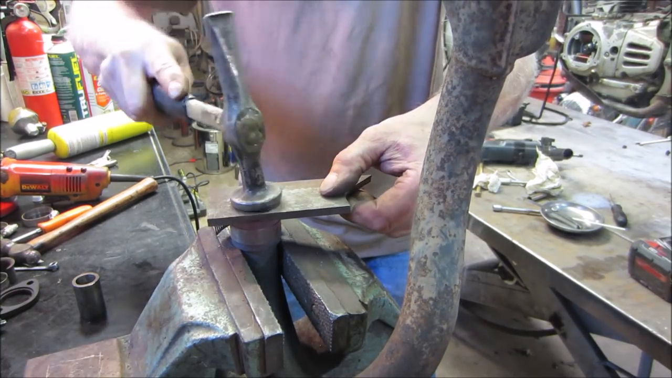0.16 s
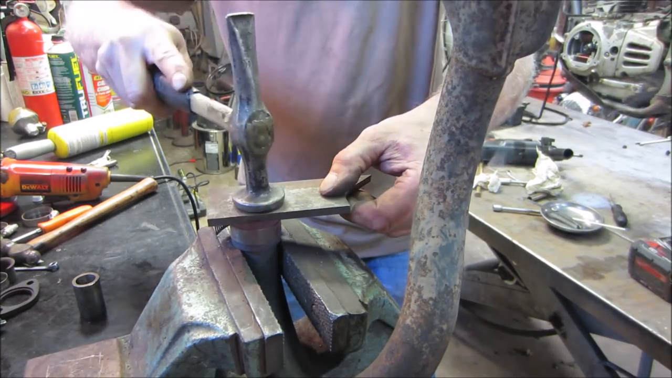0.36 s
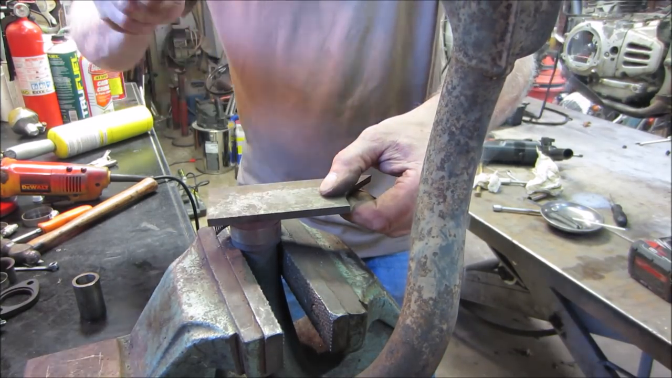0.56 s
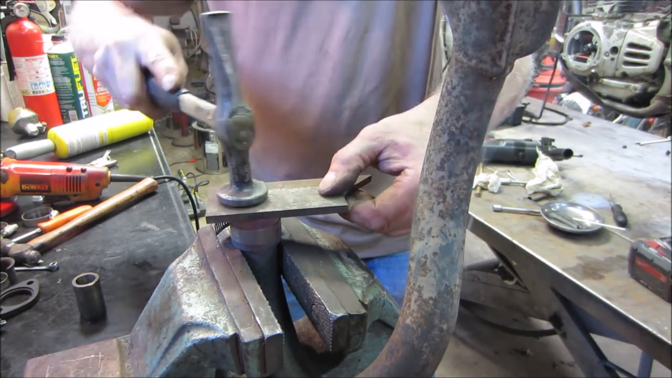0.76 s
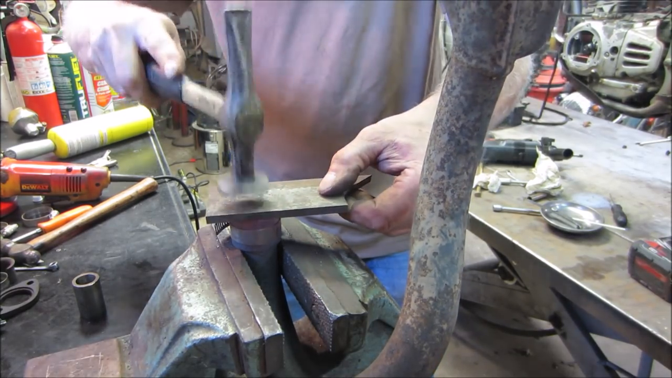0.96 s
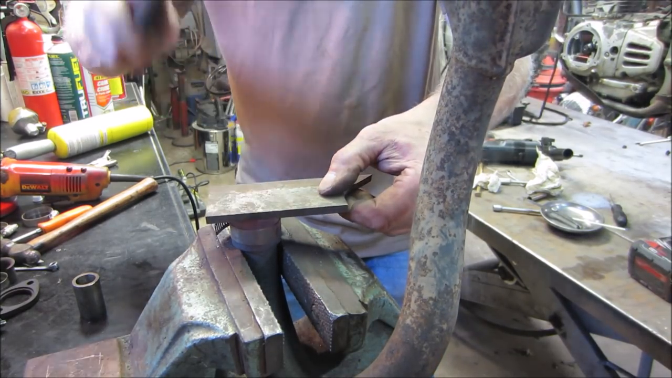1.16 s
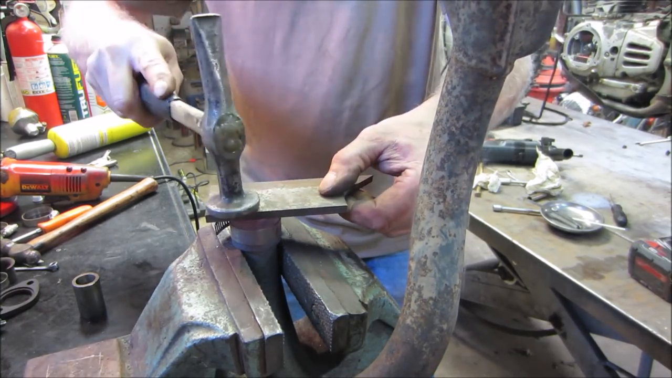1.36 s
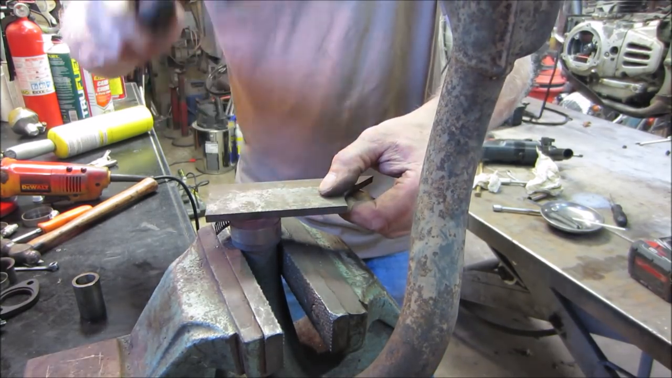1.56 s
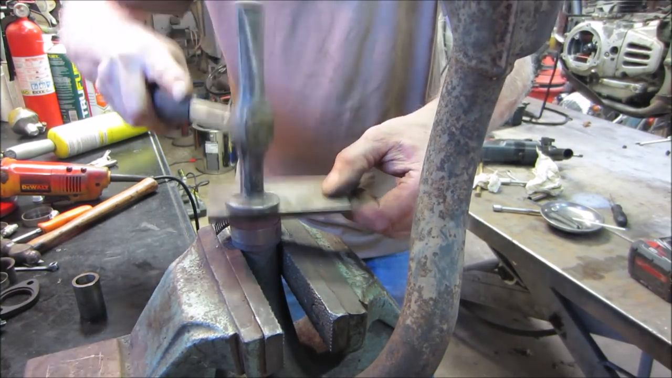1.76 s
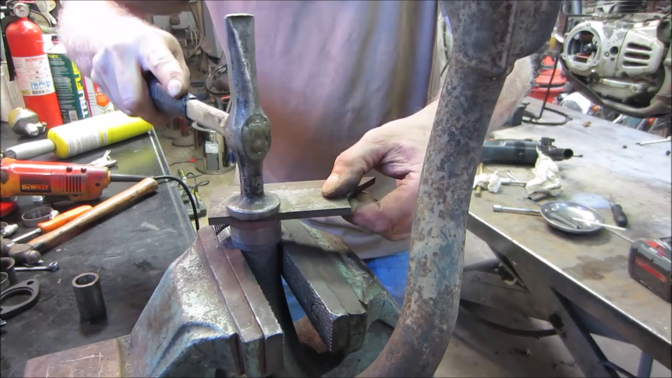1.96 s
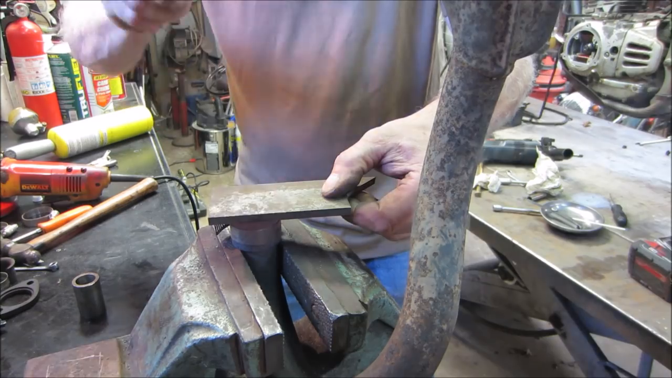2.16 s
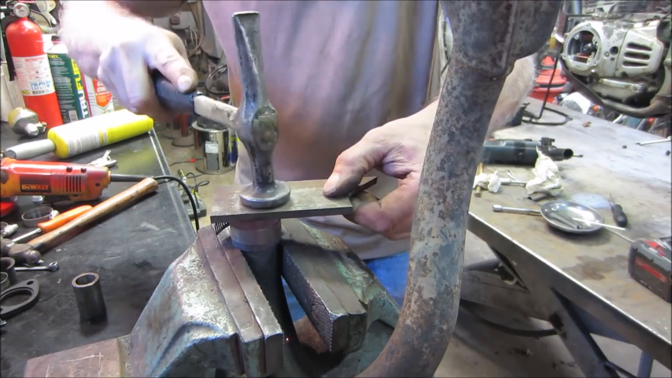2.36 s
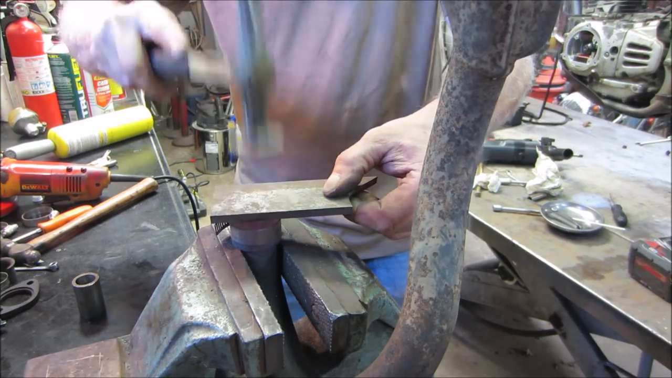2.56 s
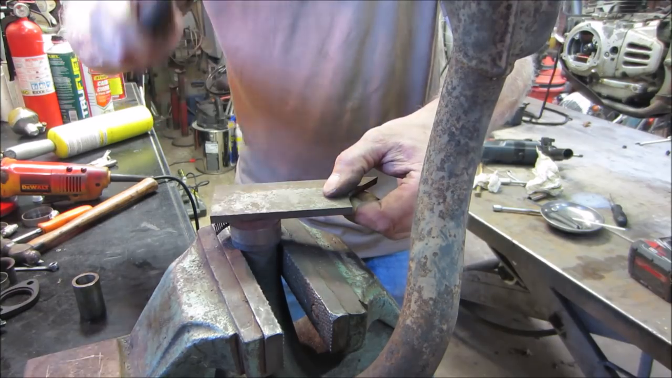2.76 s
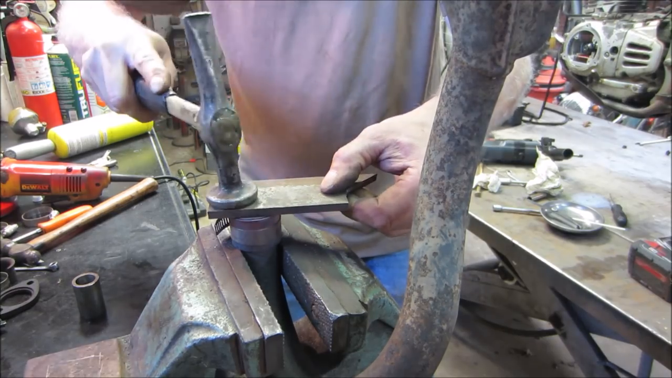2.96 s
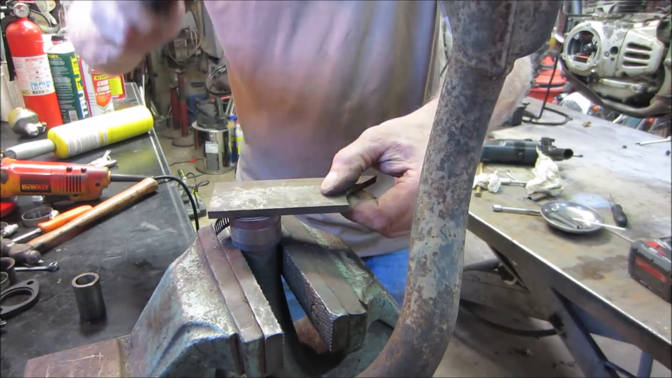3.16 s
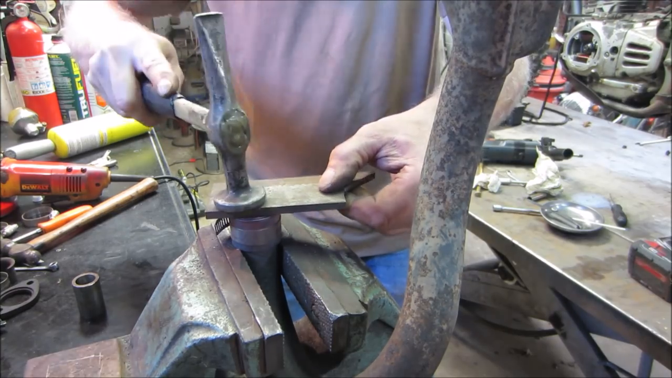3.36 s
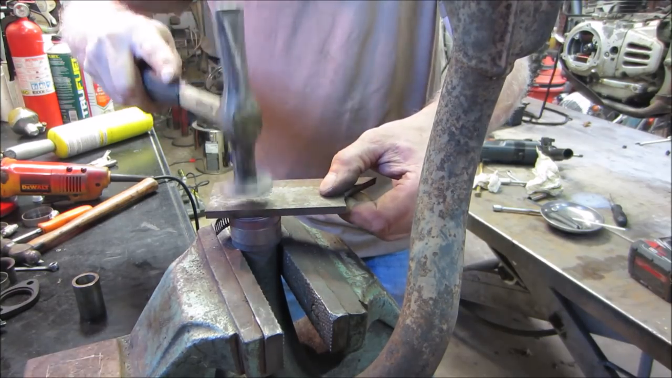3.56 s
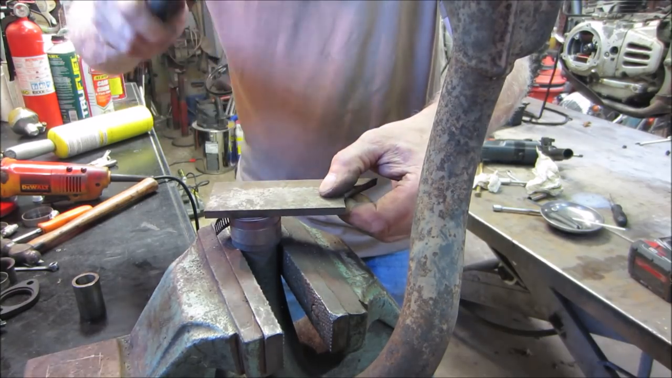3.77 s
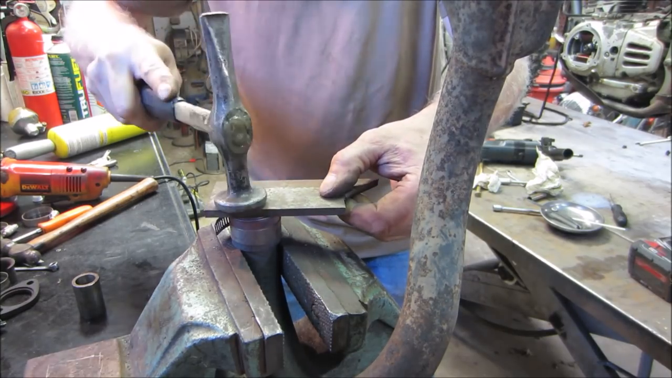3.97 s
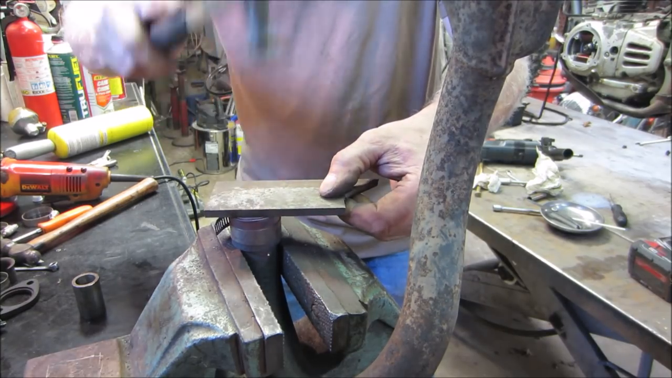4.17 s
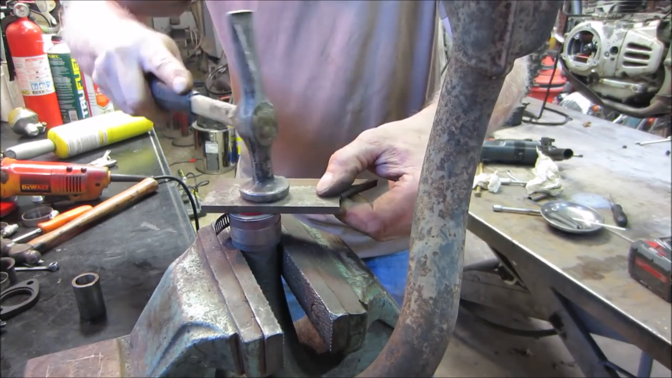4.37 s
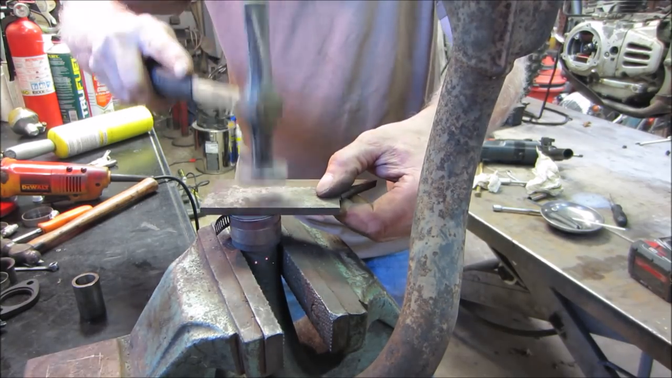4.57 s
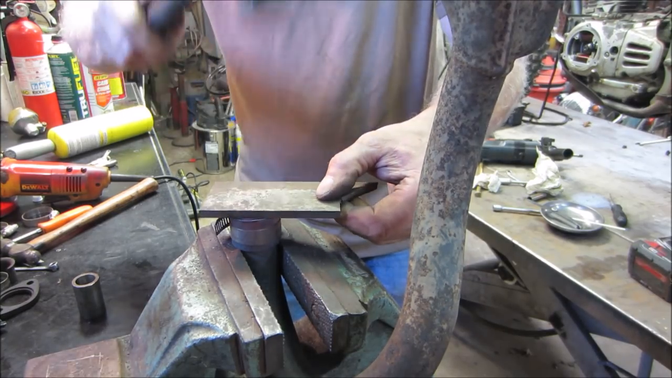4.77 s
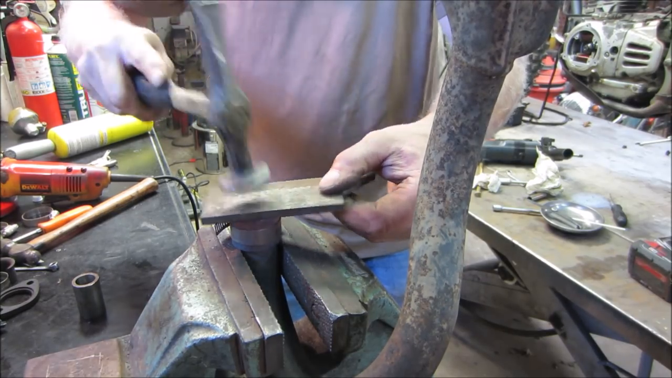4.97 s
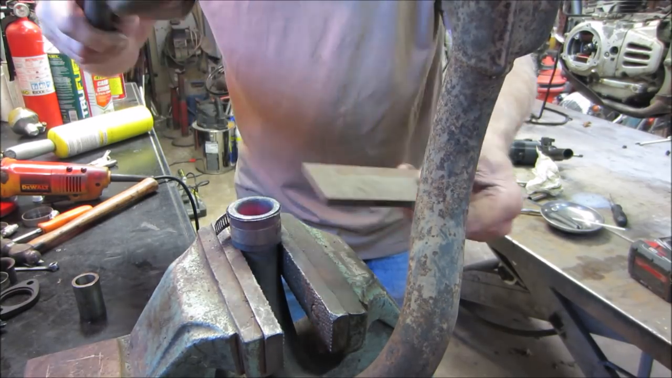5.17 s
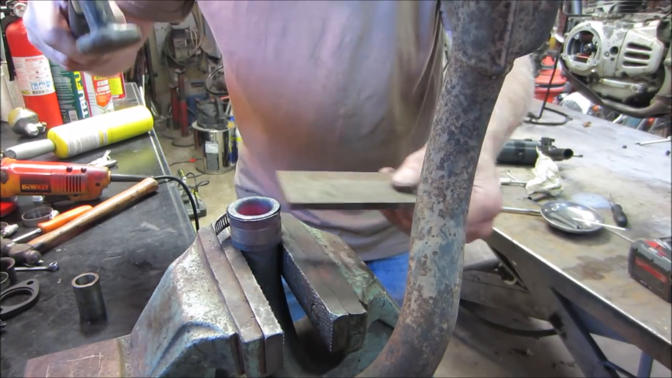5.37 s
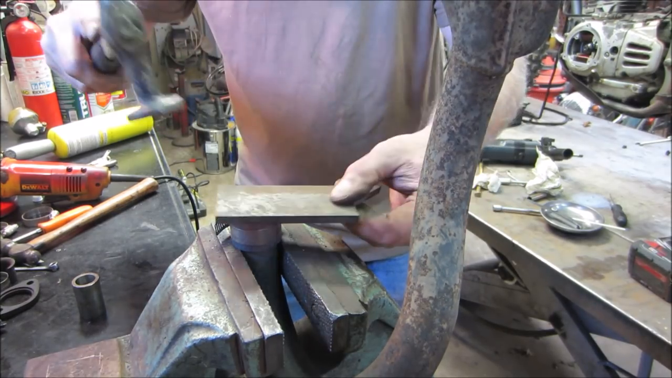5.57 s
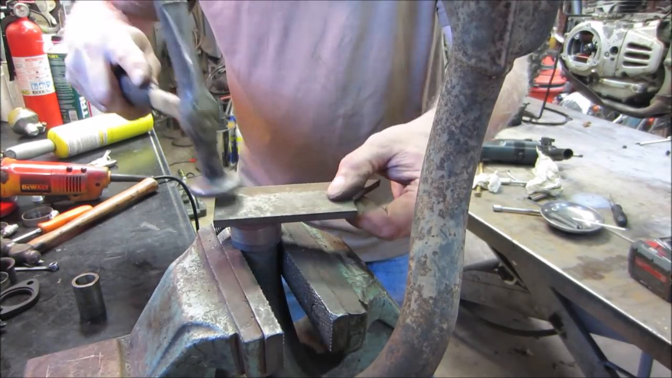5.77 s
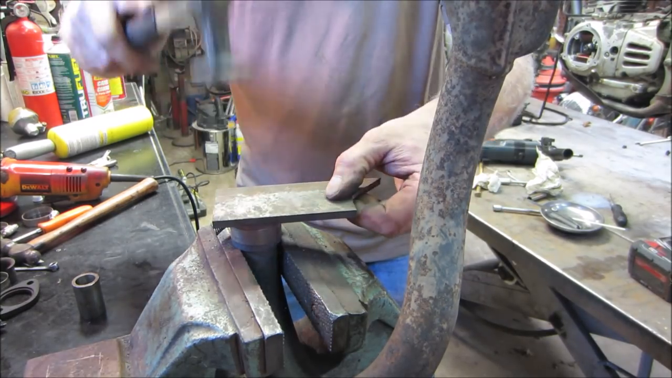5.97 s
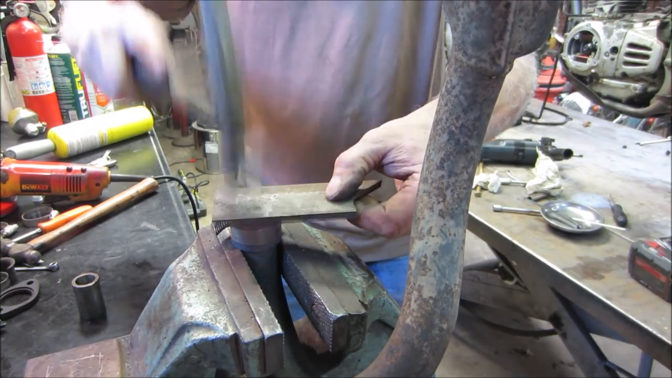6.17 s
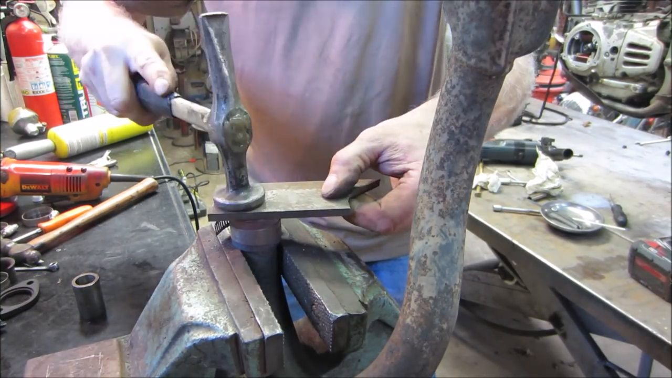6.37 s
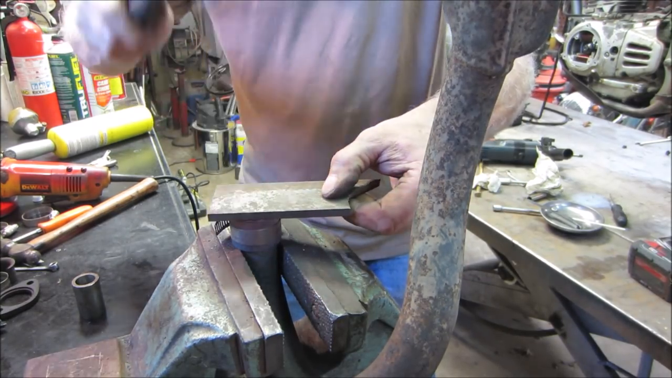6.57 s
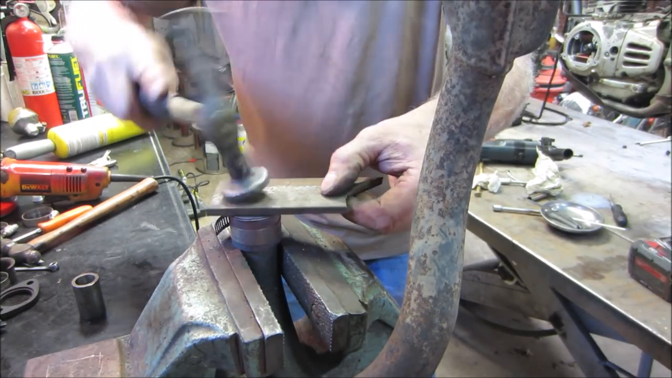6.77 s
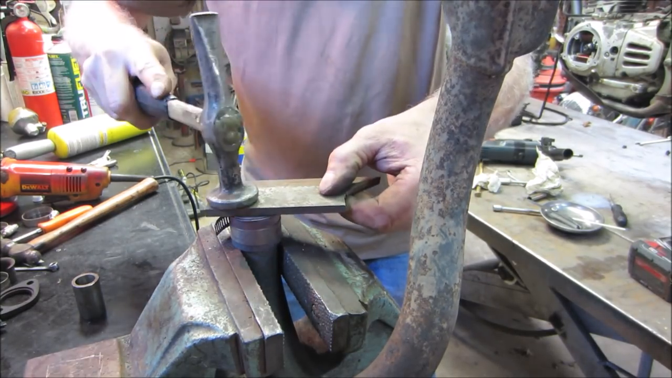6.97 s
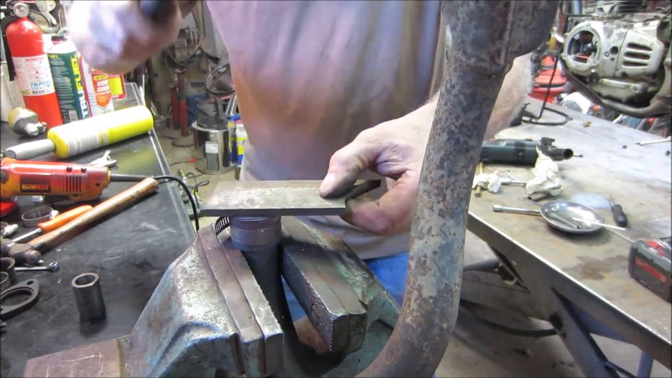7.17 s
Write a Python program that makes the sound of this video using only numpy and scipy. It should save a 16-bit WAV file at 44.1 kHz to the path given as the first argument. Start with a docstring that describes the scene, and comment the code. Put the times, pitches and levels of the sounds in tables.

```python
"""A small workshop at one close microphone, with soft air noise, a distant hum and a steel bar still ringing.
A hammer strikes the flat bar, held by hand on a pipe end in a vice, ten times at about two blows a second.
Noise bursts make the bench thump and the steel chatter; decaying sines make the pings and the long ring.
After the ten blows the bar is laid back on the pipe with a clack and a clink, then struck twice more."""
import sys
import numpy as np
from scipy import signal
from scipy.fft import rfft, irfft, next_fast_len
from scipy.io import wavfile

SR = 44100
rng = np.random.default_rng(int(sys.argv[2]) if len(sys.argv) > 2 else 0)


def store_pcm(level_fs):
    """Save levels as 16-bit WAV."""
    pcm = np.round(np.clip(level_fs, -1, 1) * 32767).astype(np.int16)
    wavfile.write(sys.argv[1], SR, np.atleast_2d(pcm).T)


N = 317961  # samples, about 7.2 s


def amp(db):
    """Decibels to gain."""
    return 10 ** (np.asarray(db) / 20)


def unit(x):
    """Scale to rms 1."""
    return x / np.sqrt(np.mean(x ** 2) + 1e-20)


def between(ends, share):
    """The value a share (0-1) of the way from one end to the other."""
    return np.interp(share, (0, 1), ends)


def along(points, hz):
    """Read a curve of (pitch_hz, value) points on a log-frequency axis."""
    point_hz, values = np.transpose(points)
    return np.interp(np.log(hz + 1), np.log(point_hz + 1), values)


def filtered(x, response):
    """Multiply the spectrum of x by a gain that depends on frequency."""
    size = next_fast_len(len(x) + SR // 4)  # padded so the end does not wrap round
    hz = np.fft.rfftfreq(size, 1 / SR)
    return irfft(rfft(x, size) * response(hz), size)[:len(x)]


def noise(spectrum, size, bright_db=0, corner_hz=4500):
    """Coloured noise of rms 1, its treble raised or lowered by a shelf."""
    def response(hz):
        shelf_db = bright_db * hz ** 4 / (hz ** 4 + corner_hz ** 4)
        return amp(along(spectrum, hz) + shelf_db)
    return unit(filtered(rng.standard_normal(size), response))


def fade(t, t60):
    """Exponential decay, 60 dB down at t60 seconds."""
    return np.exp(-np.log(1000) * t / t60)


def sine(hz, t):
    """A tone of rms 1 at a random phase."""
    return np.sqrt(2) * np.sin(2 * np.pi * (hz * t + rng.random()))


def modes(table, t, scatter_db=2, contact_s=0.00074):
    """Damped modes, struck at new strengths each time; a longer contact softens their start."""
    ring = np.zeros(len(t))
    for hz, level_db, t60 in table:
        strength_db = level_db + scatter_db * rng.standard_normal()
        ring += amp(strength_db) * sine(hz, t) * fade(t, t60)
    return ring * (1 - np.exp(-t / contact_s))


def add(track, start_s, sound):
    """Mix a sound into the track from start_s, cut at the track's end."""
    part = track[round(start_s * SR):][:len(sound)]
    part += sound[:len(part)]


# decay of the cluttered room: pitch_hz, t60_s
WALLS = [(100, 0.4), (400, 0.27), (1500, 0.41), (3500, .44), (6000, 0.4), (10000, 0.41), (12000, 0.33),
         (15000, 0.3)]


def workshop(x, wet_db, build_s=0.0023):
    """A sound plus the room's answer: noise that swells in a few ms and decays at a rate set by pitch."""
    hz, t, cells = signal.stft(rng.standard_normal(SR * 3 // 4), SR, nperseg=256)
    decaying = cells * fade(t, along(WALLS, hz)[:, None])
    tail = signal.istft(decaying, SR, nperseg=256)[1]
    tail *= 1 - np.exp(-(np.arange(len(tail)) / SR / build_s) ** 2)
    reverb = signal.fftconvolve(x, tail / np.linalg.norm(tail))[:len(x)]
    return x + amp(wet_db) * reverb


# air of the quiet shop, relative density: pitch_hz, level_db
AIR = [(20, -17), (45, 1), (110, -3), (200, -5), (330, -12), (600, -6.5), (1300, -15.5), (2400, -19.5),
       (4000, -33.5), (8000, -35), (11000, -50.5), (15000, -60)]
# a distant machine: pitch_hz, level_db
HUM = [(53.8, -66), (506, -81), (565.2, -78)]


def room_tone(air_db=-63.5):
    """Shaped noise for the air and steady sines for the distant machine."""
    t = np.arange(N) / SR
    hum = sum(amp(level_db) * sine(hz, t) for hz, level_db in HUM)
    return amp(air_db) * noise(AIR, N) + hum


def long_note(t, hz, level_db, t60, swell_s=0.0021):
    """One long note of the bar, swelling as the hammer leaves it, then decaying exponentially."""
    return amp(level_db) * sine(hz, t) * fade(t, t60) * (1 - np.exp(-t / swell_s))


# the bar's low, middle and high long notes: pitch_hz
RING_HZ = [887.3, 1496.5, 1857.3]


def lingering_ring():
    """The bar still sings from an earlier blow: its low and high notes decay from the start."""
    t = np.arange(N) / SR
    return long_note(t, RING_HZ[0], -37.0, 1.0) + long_note(t, RING_HZ[2], -49.5, 0.83)


# the bar is laid back on the pipe and settles, relative: start_s, clack_level_db, clink_level_db
SET_DOWN = [(5.6305, -41, -39), (5.657, -40.5, -46), (5.885, -54, -66.5)]
# dull noise of the slow contact, relative density: pitch_hz, level_db
CLACK = [(100, -9), (450, -4.5), (1000, 4), (2400, 0), (3100, -15), (4200, -13), (5000, -22.5), (6500, -22),
         (9000, -30), (15000, -59)]
# modes of bar and pipe touching lightly, relative: pitch_hz, level_db, t60_s
CLINK = [(482, -8, .2), (888, -12, .9), (1190, -7, .15), (1496, -12, .38), (1858, -3, .6), (2393, 0, .29),
         (2810, -13, .2), (3445, -4, .07), (3919, -8, .06), (4290, -7, .05), (4474, -13, .07),
         (5776, -8, .12), (6471, -15, .1)]


def set_down(clack_gain_db=8, contact_s=0.0004):
    """The bar meets the pipe slowly: a dull clack of noise and a clink of damped modes."""
    track, t = np.zeros(N), np.arange(SR) / SR
    envelope = fade(t, .12) * (1 - np.exp(-t / contact_s))
    for start_s, clack_db, clink_db in SET_DOWN:
        clack = amp(clack_db + clack_gain_db) * noise(CLACK, len(t)) * envelope
        clink = amp(clink_db) * modes(CLINK, t, scatter_db=3.5, contact_s=contact_s)
        add(track, start_s, workshop(clack + clink, wet_db=-14.0))
    return track


def crowded(x, ripple_db=4):
    """The crowded resonances of vice and pipe: every contact picks out a different set."""
    knots_hz = np.arange(0, SR / 2, 70)
    strengths_db = ripple_db * rng.standard_normal(len(knots_hz))
    return unit(filtered(x, lambda hz: amp(np.interp(hz, knots_hz, strengths_db))))


# steel on steel, relative density: pitch_hz, level_db
CLASH = [(30, -9.5), (150, -11.5), (350, -4.5), (550, 0.5), (1100, 2.5), (2000, 2), (3000, 2), (4000, -6),
         (6000, -1.5), (8700, -5.5), (10300, -12), (11400, -29.5), (14000, -19.5), (15700, -37.5)]


def clash(t, bright_db, crack_db=13, crack_t60=0.076, chatter_db=11, chatter_t60=0.19):
    """A hard crack of noise, with the loose steel faces chattering through crowded resonances."""
    crack = amp(crack_db) * fade(t, crack_t60) * noise(CLASH, len(t), bright_db)
    chatter_noise = crowded(noise(CLASH, len(t), bright_db))
    return crack + amp(chatter_db) * fade(t, chatter_t60) * chatter_noise


# the shorter modes of bar, pipe and vice, relative: pitch_hz, level_db, t60_s
STEEL = [(372, -33, .7), (490, -5, .1), (545, -5, .1), (680, -9, .12), (1195, -10, .15), (1335, -5, .09),
         (1817, -11, .3), (2081, -7, .2), (2394, -5, .22), (2430, -6, .25), (2980, -1, .13),
         (3162, -21, .4), (3348, -9, .12), (3460, -8, .1), (3647, -7, .16), (3802, -5, .1),
         (4290, -12, .15), (4498, -12, .22), (4694, -13, .17)]


def steel_modes(t):
    """Bar, pipe and vice ring together as damped modes."""
    return modes(STEEL, t)


# high pings of the hammer head landing square, relative: pitch_hz, level_db, t60_s
SQUARE = [(5738, 4, .08), (5765, 9, .13), (5790, -1, .25)]


def square_pings(t):
    """The hammer head's damped modes when its face lands flat."""
    return modes(SQUARE, t)


# the hammer falls back on the bar after a blow, relative: start_s, level_db
REBOUNDS = [(1.844, -30), (3.397, -31.5), (3.415, -27.5), (3.932, -32), (6.286, -33.5)]


def rebounds(bright_db=-1, steel_db=-7, ping_db=-6):
    """Light second contacts wake the same steel without the thump."""
    track, t = np.zeros(N), np.arange(SR) / SR
    for start_s, level_db in REBOUNDS:
        contact = clash(t, bright_db, crack_db=13.5, chatter_db=6, chatter_t60=0.058)
        contact += amp(steel_db) * steel_modes(t) + amp(ping_db) * square_pings(t)
        add(track, start_s, amp(level_db) * workshop(contact, wet_db=-16.0))
    return track


# the bench under the vice, relative density: pitch_hz, level_db
THUMP = [(20, 1.5), (50, -3), (150, -2), (300, 5.5), (700, -1.5), (2000, -45.5), (8000, -96)]
# strength of the vice's push, relative: loose_grip_db, firm_grip_db
PUSH_DB = (5.5, 15.5)


def bench(t, grip, shudder_db, push_s=.0008, shudder_t60=0.05):
    """The vice gives one low push, stronger with a firm grip, and the bench shudders briefly."""
    u = t / push_s
    push = -amp(between(PUSH_DB, grip)) * u * np.exp(1 - u)  # one pulse, peaking at push_s
    return push + amp(shudder_db) * noise(THUMP, len(t)) * fade(t, shudder_t60)


# high pings of the hammer head landing tilted, relative: pitch_hz, level_db, t60_s
GLANCING = [(5169, 12, .09), (6499, 9, .09), (7100, 6, .07), (7192, 8, .11), (8282, 12, .1), (8325, 5, .18),
            (8576, 5, .08)]
# the highest pings, relative: pitch_hz, level_db, t60_s
TOP_PING = [(10160, 4, .08), (10200, 8, .11), (13948, -14, .15), (14507, -13, .1)]
# gain of the highest pings: centre_db, edge_db
TOP_PING_DB = (-26, -1.5)


def pings(t, tilt, edge, glancing_db=-3):
    """Tilt shares the blow between square and glancing pings; the top ping grows towards the edge."""
    square = (1 - tilt) * square_pings(t)
    glancing = tilt * amp(glancing_db) * modes(GLANCING, t)
    top = amp(between(TOP_PING_DB, edge)) * modes(TOP_PING, t)
    return square + glancing + top


# a firm grip couples the bar to the vice: the low note is louder and dies sooner (loose, firm)
LOW_NOTE_DB, LOW_NOTE_T60_S = (-4.5, 5.5), (1.25, 0.7)
# a blow near the edge twists the bar and wakes its middle note (centre, edge)
MIDDLE_NOTE_DB, MIDDLE_NOTE_T60_S = (-9.5, 8.5), .41
# strength of the high note, relative: loose_grip_db, firm_grip_db
HIGH_NOTE_DB = (3, 4.5)


def bar_notes(t, edge, grip, high_t60):
    """The bar's three long notes, set by where it is hit and how it is held."""
    low_hz, middle_hz, high_hz = RING_HZ
    low = long_note(t, low_hz, between(LOW_NOTE_DB, grip), between(LOW_NOTE_T60_S, grip))
    middle = long_note(t, middle_hz, between(MIDDLE_NOTE_DB, edge), MIDDLE_NOTE_T60_S)
    high = long_note(t, high_hz, between(HIGH_NOTE_DB, grip), high_t60)
    return low + middle + high


# treble shelf of the clash, brightest right over the pipe: centre_db, edge_db
BRIGHT_DB = (3, -1.5)
# hammer blows, levels relative: start_s, level_db, bench_shudder_db, hammer_face_tilt (0-1),
# distance_from_centre_line (0-1), grip_pressing_down (0-1), high_note_t60_s
BLOWS = [(0.2231, -23.5, 11, .4, .45, 0.12, .6), (0.7637, -24, 7.5, .22, .52, .28, 0.53),
         (1.2877, -26, 15.5, .85, .62, 0.1, 0.46), (1.818, -25.5, -3, .15, .85, .1, 0.62),
         (2.3526, -24.5, 0.5, 0.1, .38, 0, 0.51), (2.8777, -26, 8.5, 0.5, 0.7, 0.9, 0.43),
         (3.3845, -27.5, 3.5, 0.2, 0.87, .28, 0.37), (3.9029, -27.5, 2.5, 0.3, 0.6, 0.6, 0.46),
         (4.3926, -27, -1, .25, .05, 0.9, .33), (4.8885, -28.5, 3, .25, 0.37, 0.7, .64),
         (6.2691, -27, 5, 0.4, .42, 0.2, 0.51), (6.8337, -25, 8.5, 0.2, 0.6, 0.7, 0.34)]


def hammer(steel_db=-1.5):
    """Full blows: clash, pings and steel modes fill the room, the bench thumps, the bar rings on."""
    track, t = np.zeros(N), np.arange(SR * 3 // 2) / SR
    for start_s, level_db, shudder_db, tilt, edge, grip, high_t60 in BLOWS:
        impact = clash(t, between(BRIGHT_DB, edge)) + amp(steel_db) * steel_modes(t)
        body = bench(t, grip, shudder_db) + bar_notes(t, edge, grip, high_t60)
        blow = workshop(impact, wet_db=-11)
        blow += workshop(pings(t, tilt, edge), wet_db=-12.0)
        blow += workshop(body, wet_db=-21)
        add(track, start_s, amp(level_db) * blow)
    return track


def scene():
    """Everything at one close microphone."""
    return (room_tone() + lingering_ring() + set_down() + rebounds() + hammer())[None]


def limiter(x, threshold_db=-12.0, memory_s=.01):
    """Gain follows the recent power: the first crack slips through, the next few ms are held down."""
    keep = np.exp(-1 / (memory_s * SR))
    power = signal.lfilter([1 - keep], [1, -keep], x ** 2)
    return x / np.sqrt(1 + power / amp(threshold_db) ** 2)


def record(dry):
    """The recorder limits the blows, rounds off their peaks and keeps nothing above its band limit."""
    held = limiter(dry[0])
    rounded = held / (1 + (held / .9) ** 4) ** .25  # peaks stay within 0.9
    return filtered(rounded, lambda hz: hz < 15900)[None]


dry = scene()
out = record(dry)
store_pcm(out)
```